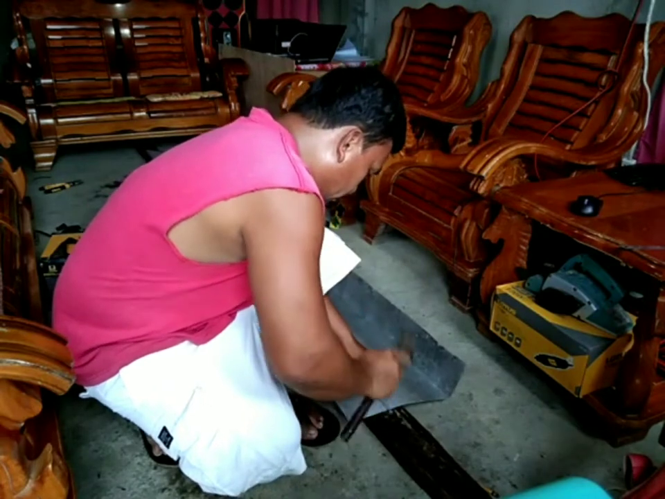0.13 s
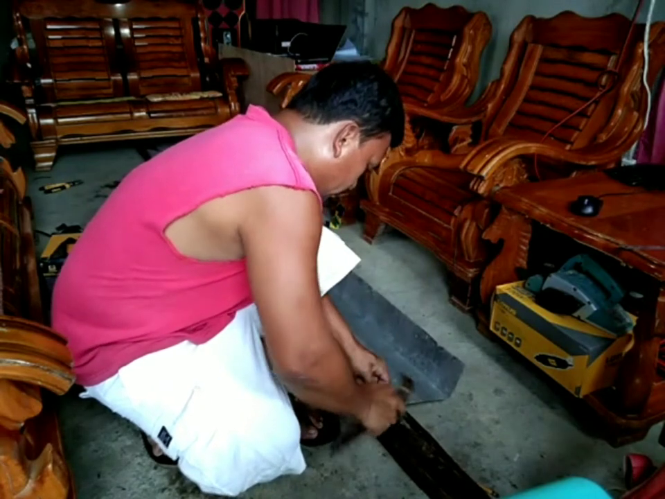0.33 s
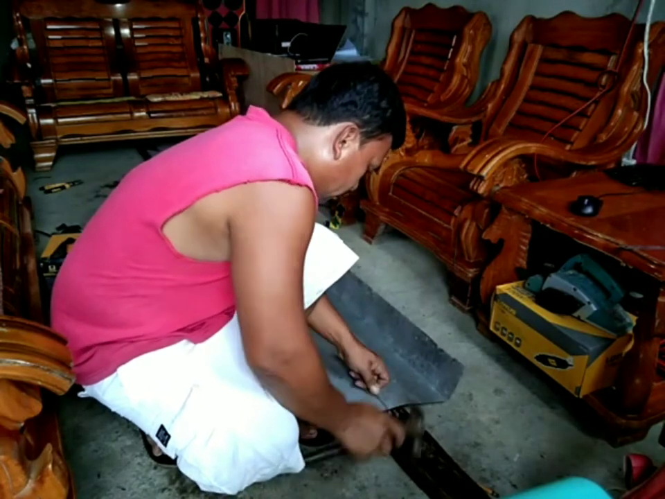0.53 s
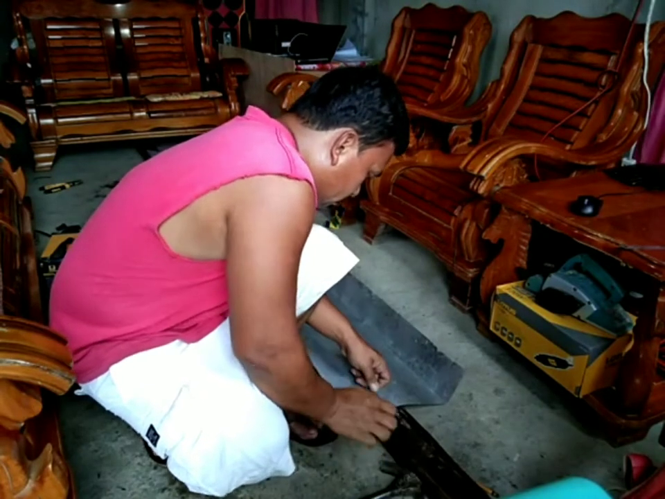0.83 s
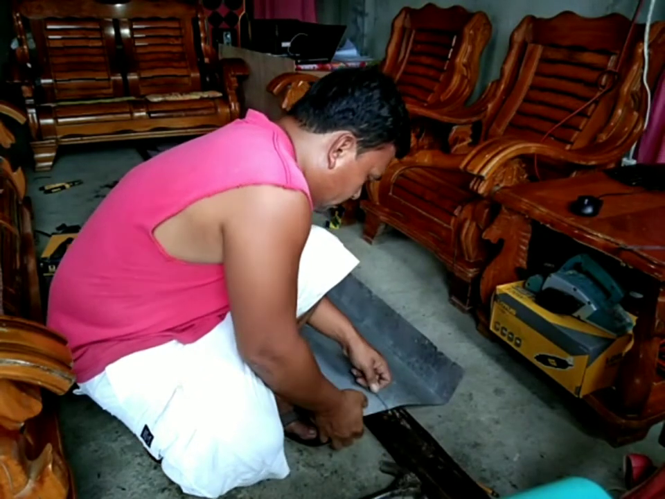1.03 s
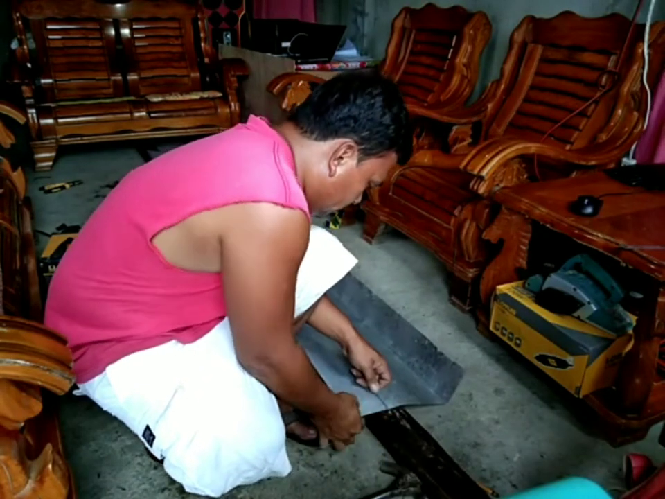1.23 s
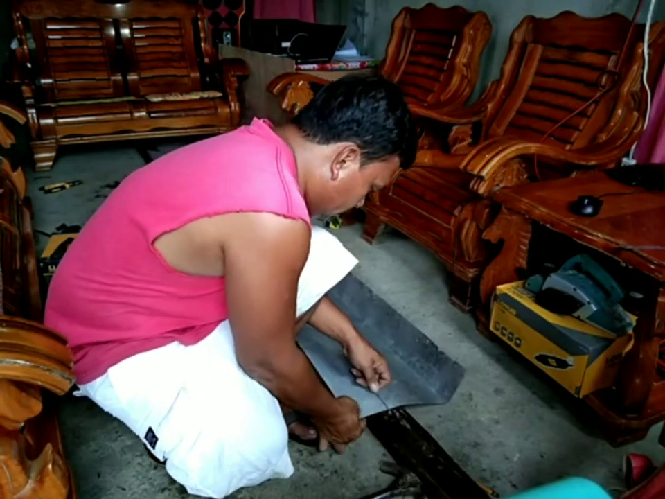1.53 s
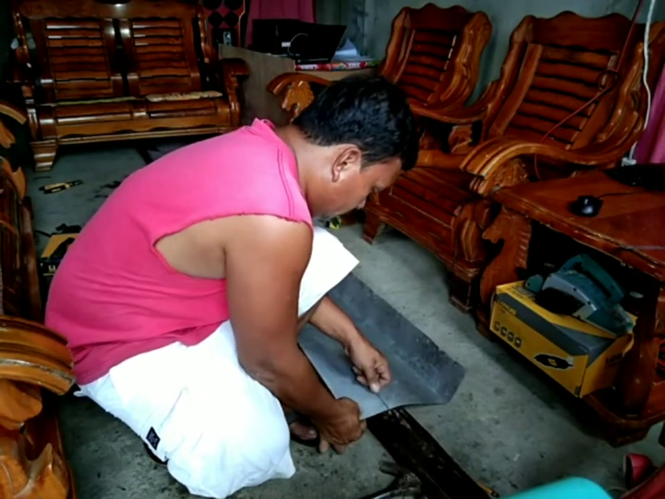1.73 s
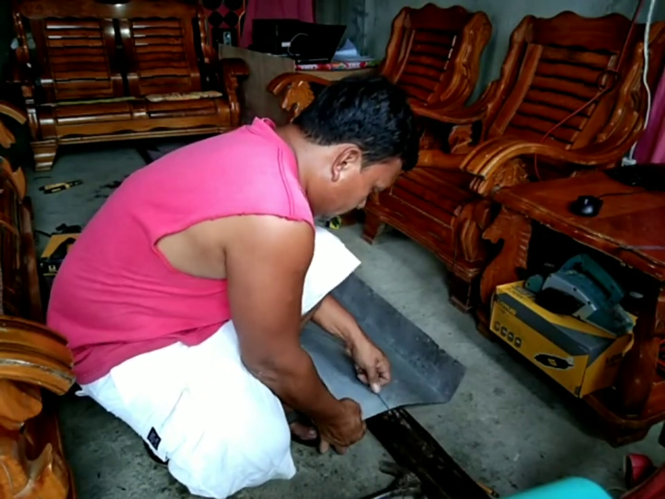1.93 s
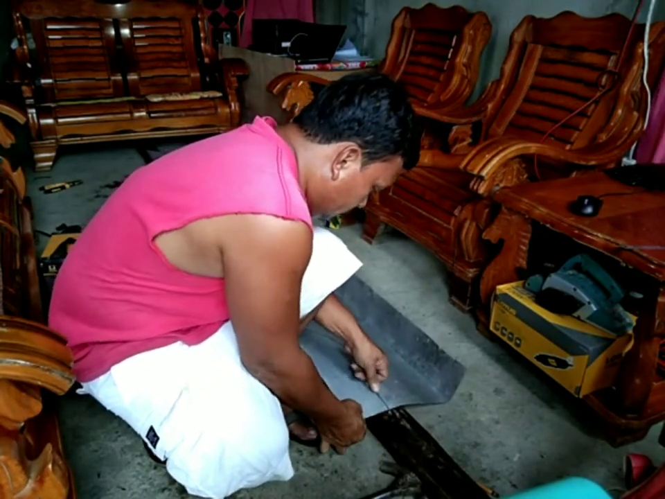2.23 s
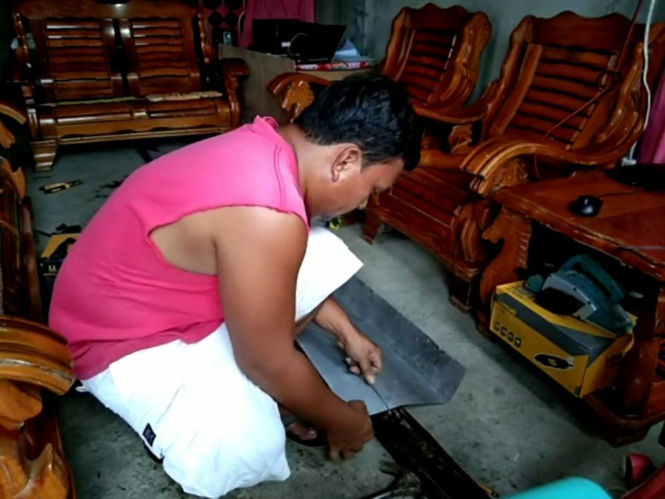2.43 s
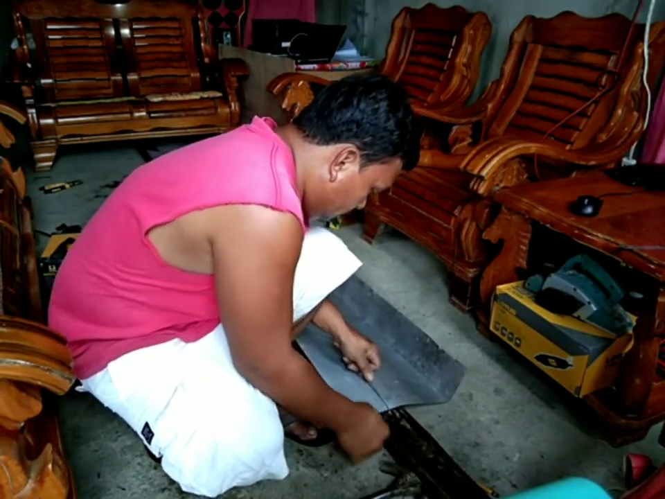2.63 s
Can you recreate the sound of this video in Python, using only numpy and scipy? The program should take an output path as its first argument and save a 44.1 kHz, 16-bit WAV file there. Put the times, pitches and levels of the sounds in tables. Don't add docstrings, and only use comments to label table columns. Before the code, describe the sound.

Metal sheet banged twice with a bar, bar drops and rattles, then faint taps over engine hum.

```python
import sys
import numpy as np
from scipy import signal
from scipy.fft import rfft, irfft, next_fast_len
from scipy.io import wavfile
from scipy.ndimage import uniform_filter1d, minimum_filter1d, map_coordinates

SR = 44100
rng = np.random.default_rng(int(sys.argv[2]) if len(sys.argv) > 2 else 0)


def elevation(decibels):
    levels = np.asarray(decibels, float)
    return 10 ** (levels / 20)


def bounce(signal):
    frames = np.transpose(np.atleast_2d(signal))
    limited = np.clip(frames, -1, 1)
    pcm = np.round(limited * 32767).astype(np.int16)
    wavfile.write(sys.argv[1], SR, pcm)


N = 123479


def unit(x):
    return x / np.sqrt(np.mean(x ** 2) + 1e-20)


def along(points, hz):
    f, v = np.transpose(points)
    return np.interp(np.log(hz + 1), np.log(f + 1), v)


def wobble(rate, count=N):
    knots = rng.standard_normal(int(count * rate / SR) + 4)
    return map_coordinates(knots, [np.arange(count) * rate / SR])


def filtered(x, response):
    m = next_fast_len(N + 8192)
    return irfft(rfft(x, m) * response(np.fft.rfftfreq(m, 1 / SR)), m)[:N]


def noise(spectrum):
    return unit(filtered(rng.standard_normal(N), lambda hz: elevation(along(spectrum, hz))))


def since(s):
    t = np.arange(N) / SR - s
    return np.maximum(t, 0), t >= 0


def add(out, x, s):
    part = out[max(round(s * SR), 0):][:len(x)]
    part += x[:len(part)]


def ringing(t, modes, attack_s, flutter=0):
    chatter_db, chatter_rad, chatter_rate = 1.2, .35, 60
    bend = 1.15
    total = np.zeros(len(t))
    for hz, db, t60, hold_s in modes:
        fall_db = 60 * (np.maximum(t - hold_s, 0) / t60) ** bend
        level_db = db - fall_db + flutter * chatter_db * wobble(chatter_rate, len(t))
        phase = 2 * np.pi * hz * t + flutter * chatter_rad * wobble(chatter_rate, len(t))
        total += elevation(level_db) * np.sin(phase)
    return total * (1 - np.exp(-t / attack_s))


def room(x, share=1):
    # hz [Hz], t60_s [s]
    room_decay = [(200, 0.98), (700, .8), (1400, 1), (4000, 0.35), (8000, 0.59)]
    hz, t, z = signal.stft(rng.standard_normal(SR), SR, nperseg=256)
    fall = elevation(-60 * t / (share * along(room_decay, hz)[:, None]))
    tail = signal.istft(z * fall, SR, nperseg=256)[1]
    return signal.fftconvolve(np.pad(x, (300, 0)), tail / np.linalg.norm(tail))[:N]


def yard():
    # hz [Hz], density_db [dB per Hz]
    hiss_tone = [(400, -29), (650, 1.5), (1500, -3.5), (3000, -6), (8000, -11.5), (9000, -41)]
    # start_s [s], length_s [s], pitch_hz [Hz], level_db [dB]; those before 2.3 s are yard noise,
    # the later ones pitchy streaks of the finger scuff and the first knock
    scrap_events = [(1.28, .18, 2480, -65), (1.33, .15, 1850, -65), (1.36, .24, 780, -64),
                    (1.555, .2, 1520, -68), (1.44, .08, 2380, -74), (1.61, .21, 2470, -65),
                    (1.71, .12, 760, -65), (1.78, .14, 830, -65), (1.8, .08, 1850, -73),
                    (1.77, .28, 2060, -73), (1.95, .08, 750, -69), (1.8, .11, 2460, -74),
                    (1.95, .19, 2490, -73), (1.71, .06, 2250, -71), (1.42, .14, 2080, -72),
                    (1.5, .04, 1700, -71), (2.19, .11, 840, -61), (1.38, .12, 7200, -84),
                    (2.376, .04, 3500, -64), (2.378, .06, 1750, -65), (2.385, .13, 2400, -59),
                    (2.43, .06, 4250, -64), (2.56, .07, 3800, -76), (2.575, .08, 6250, -78),
                    (2.39, .12, 2950, -62), (2.445, .07, 3850, -65), (2.39, .07, 4800, -65),
                    (2.4, .035, 5900, -67), (2.378, .05, 6900, -68), (2.385, .07, 7380, -67),
                    (2.378, .09, 5250, -69), (2.41, .05, 6450, -72), (1.76, .16, 580, -64),
                    (2.47, .08, 4050, -71)]
    width_hz, flutter_db, stretch = 50, 4, 1.25
    out = elevation(-74.5) * noise(hiss_tone)
    for start_s, length_s, pitch_hz, level_db in scrap_events:
        half_width = width_hz * np.sqrt(pitch_hz / 1000)
        band = unit(filtered(rng.standard_normal(N), lambda f: 1 / (1 + ((f - pitch_hz) / half_width) ** 4)))
        progress = np.clip(since(start_s)[0] / (stretch * length_s), 0, 1)
        swell = np.abs(np.sin(np.pi * np.sqrt(progress)))
        out += elevation(level_db - 2 + flutter_db * wobble(40)) * band * swell
    return out


def engine():
    # time_s [s], firing_rate [firings per s], level_db [dB]
    idle = [(0.0, 27.3, -37), (0.78, 27.4, -38), (2.8, 25.5, -41)]
    # order [multiple of firing rate], level_db [dB]
    orders = [(1, -36), (2, -20), (3, -20.5), (4, -7), (5, 1.5), (6, -2), (7, -19), (8, -36), (9, -14.5),
              (10, -18), (11, -14.5), (12, -20.5), (13, -4.5), (14, -7.5), (15, -23.5), (16, -11),
              (17, -20.5), (18, -30.5), (19, -24.5), (20, -20), (21, -34.5)]
    # hz [Hz], density_db [dB per Hz]
    rumble_tone = [(15, -58.5), (25, -33.5), (54, -20), (140, -2.5), (281, -16), (343, -12), (420, -6.5),
                   (528, -29), (620, -47), (810, -79), (1360, -120)]
    swing_db, drift_rad = -1, 0.38
    smear_rad = .035
    load_end_s, load_db, load_orders = 1.665, 10, range(8, 13)
    time_s, rate, level_db = np.transpose(idle)
    t = np.arange(N) / SR
    turn = 2 * np.pi * np.cumsum(np.interp(t, time_s, rate)) / SR
    load = load_db * np.clip((load_end_s - t) * 40, 0, 1)
    tones = np.zeros(N)
    for k, order_db in orders:
        gain_db = order_db + swing_db * wobble(20) + load * (k in load_orders)
        phase = k * (turn + 1.1) + smear_rad * k * k + 1.2 + drift_rad * wobble(5.1)
        tones += elevation(gain_db) * np.cos(phase)
    rumble = elevation(-4 + 0.7 * wobble(15)) * noise(rumble_tone)
    return elevation(np.interp(t, time_s, level_db)) * (unit(tones) + rumble)


def scuff():
    # hz [Hz], density_db [dB per Hz]
    scuff_tone = [(600, -16), (1000, -3), (2500, 0), (5000, -4), (7500, -6), (8000, -16)]
    start_s, rise_s, fall_s, level_db = 2.377, .03, .06, -55
    t = since(start_s)[0]
    mode_db = 6 * rng.standard_normal(120)
    rasp = unit(filtered(noise(scuff_tone), lambda hz: elevation(np.interp(hz, np.arange(120) * 150, mode_db))))
    swell = (1 - np.exp(-t / rise_s)) * np.exp(-t / fall_s)
    return elevation(level_db + 3.2 * wobble(80)) * swell * rasp


def bar():
    # start_s [s], ring_db [dB], clack_db [dB], lightness [0-1], chatter_s [s before it rings free]
    landings = [
        (0.8572, -33, -41.5, 1, .015),
        (.905, -36, -47.5, .7, 0.03),
        (.9412, -8, -15, 0, .083),
        (1.004, -60, -20, 0, 0.028),
    ]
    bar_pitches = [2004, 2568, 3224, 4151, 4325, 4450, 4604, 5156, 5505, 5661, 5894, 7241, 7645, 8349]
    # hard_db [dB], light_db [dB], t60_s [s], fed [share of the chatter that feeds it]
    bar_modes = [(-19, -4, .15, .35), (-30, -6, .25, 1.3), (-30, -18, .2, .4), (-12, -7, .16, 1),
                 (0, -16, .1, 1), (-26, -30, .1, 1), (-9, -6, .12, .95), (-17, -24, .12, 1),
                 (-25, -30, .12, .8), (-11, -28, .11, 1.05), (-16, -30, .11, 1.05), (-11, -2, .3, .2),
                 (-11, -8, .14, .4), (-28, -30, .2, .5)]
    # hz [Hz], density_db [dB per Hz]
    clack_tone = [(60, -33.5), (250, 2.5), (900, 10), (2000, -2), (5000, -15), (8000, -18.5)]
    # hz [Hz], density_db [dB per Hz]
    splash_tone = [(1500, -18.5), (3600, -13), (4200, -8), (4700, -6.5), (5600, -4), (6200, -19),
                   (7000, -14.5), (7500, -2.5), (8000, -22.5)]
    # start_s [s], level_db [dB]
    bounces = [(0.9397, -10.5), (.946, -16.5), (.9517, -19), (.9604, -17), (.976, -21), (1.007, -15.5),
               (1.028, -22), (1.042, -23.5)]
    clack_t60, splash_t60, rebound_t60 = 0.078, .16, .025
    out, after = np.zeros(N), np.arange(SR // 2) / SR
    for start_s, ring_db, clack_db, light, chatter_s in landings:
        t, on = since(start_s)
        modes = []
        for hz, (hard_db, light_db, t60, fed) in zip(bar_pitches, bar_modes):
            modes.append((hz, hard_db + light * (light_db - hard_db), t60, fed * chatter_s))
        add(out, elevation(ring_db) * ringing(after, modes, attack_s=0.0011, flutter=1), start_s)
        out += on * elevation(clack_db - 60 * t / clack_t60) * noise(clack_tone)
        splash_db = ring_db - 20 - 60 * np.maximum(t - chatter_s, 0) / splash_t60 + 3 * wobble(150)
        out += on * elevation(splash_db) * noise(splash_tone)
    raps = np.zeros(N)
    for start_s, level_db in bounces:
        t, on = since(start_s)
        raps += on * elevation(level_db - 60 * t / rebound_t60)
    out += raps * noise(splash_tone)
    return out + elevation(-14) * room(out, share=.7)


def sheet_modes(hz):
    # pitch_hz [Hz], width_hz [Hz], level_db [dB]
    strong_modes = [(416, 35, 5), (527, 22, 6), (828, 60, -2.5), (864, 13, -0.5), (1043, 30, -0.5),
                    (1121, 41, 1), (1536, 34, -0.5), (1693, 64, 0.5), (2206, 35, -2.5), (2410, 35, 1),
                    (2551, 39, 1.5), (2830, 10, -3.5)]
    gap_hz, dense_width_hz, scatter_db, strong_db = 36, 20, 2.5, 3

    def peak(pitch_hz, width_hz, level_db):
        return elevation(2 * level_db) / (1 + (2 * (hz - pitch_hz) / width_hz) ** 2)

    pitches = np.cumsum(gap_hz * (.3 + 1.4 * rng.random(size=260)))
    gains_db = scatter_db * rng.standard_normal(size=260)
    dense = sum(peak(f, dense_width_hz, db) for f, db in zip(pitches, gains_db))
    strong = sum(peak(f, width, db + strong_db) for f, width, db in strong_modes)
    return np.sqrt(dense / dense[hz < 8000].mean() + strong)


def sheet(hits, spectrum, climb, dies):
    # hz [Hz], climb_s [s]
    climb_times = [(200, .01), (1000, 0.025), (2000, .05), (3000, 0.072), (4500, 0.094), (8000, 0.17)]
    # hz [Hz], t60_s [s]
    crash_decay = [(150, 3.2), (500, 1.49), (1500, 0.75), (4000, 0.62), (8000, 0.45)]
    # hz [Hz], density_db [dB per Hz]
    tick_tone = [(300, -21), (1500, 12), (4000, -7.5), (7500, -8.5), (8500, -19)]
    # pitch_hz [Hz], level_db [dB], t60_s [s]
    gong_modes = [(127, 4, 0.14), (423, -7, 0.2), (520.9, -6, 0.2), (853, -10.5, 0.36),
                  (1104, -13.5, 0.027)]
    fall_bend = 1.456
    gong_lift_db = 10.5
    tick_t60, thud_lag_s = .07, 0.00608
    out, grid, after = np.zeros(N), np.arange(5000) * 2.0, np.arange(SR // 2) / SR
    modes = sheet_modes(grid)
    for start_s, crash_db, tick_db, thud_db, bright_db in hits:
        t, on = since(start_s)
        wash = unit(filtered(noise(spectrum), lambda f: np.interp(f, grid, modes)))
        hz, frame_s, z = signal.stft(wash, SR, nperseg=256)
        u = np.maximum(frame_s - start_s, 0)
        rise = 1 - np.exp(-(u / (climb * along(climb_times, hz)[:, None])) ** 2)
        fall = elevation(-60 * (u / (dies * along(crash_decay, hz)[:, None])) ** fall_bend)
        tilt = elevation(bright_db * np.log2(hz / 1500 + 0.059))[:, None]
        crash = signal.istft(z * rise * fall * tilt, SR, nperseg=256)[1][:N]
        out += on * elevation(crash_db) * crash
        out += on * elevation(tick_db - 60 * t / tick_t60) * noise(tick_tone)
        gong = [(f, db + gong_lift_db * bright_db * (f > 300), t60, 0) for f, db, t60 in gong_modes]
        add(out, elevation(thud_db) * ringing(after, gong, attack_s=0.0034), start_s + thud_lag_s)
    return out + elevation(-11) * room(out)


def knocks():
    # start_s [s], crash_db [dB], tick_db [dB], thud_db [dB], brightness_db [dB per octave]
    touches = [
        (2.438, -40, -91, -56, 1.5),
        (2.452, -37.5, -70, -56.5, 2.5),
        (2.66, -48, -90, -61, -3),
        (2.678, -40.5, -85, -45.5, -1.5),
    ]
    # hz [Hz], density_db [dB per Hz]
    knock_tone = [(300, -6), (520, -9), (870, -2), (1500, -10.5), (1950, -20.5), (2400, -14.5), (2750, -41),
                  (2950, -31), (3400, -40), (4100, -30), (4600, -47), (9000, -80)]
    return sheet(touches, knock_tone, climb=0.14, dies=0.5)


def blows():
    # start_s [s], crash_db [dB], tick_db [dB], thud_db [dB], brightness_db [dB per octave]
    strikes = [
        (-.22, -14, -60, -59.5, -2),
        (.1352, -3.5, -12.5, -15.5, 0.24),
        (.4564, -19.5, -10.5, -33, 0.5),
        (.466, -3.5, -40, -20.5, 1.54),
    ]
    # hz [Hz], density_db [dB per Hz]
    crash_tone = [(90, -33.5), (200, -15), (420, -10.5), (1000, -1), (2000, 0.5), (3200, -0.5),
                  (5000, -5.5), (7500, -8), (8600, -24.5), (11000, -65)]
    return sheet(strikes, crash_tone, climb=0.98, dies=0.93)


def suppress(x):
    # hz [Hz], threshold_db [dB]
    gate_curve = [(450, -110), (620, -78), (1300, -67.5), (2200, -90), (8000, -77)]
    slope, depth_db = 1.6, -45
    hz, _, z = signal.stft(x, SR, nperseg=512)
    power = uniform_filter1d(uniform_filter1d(np.abs(z) ** 2, size=5, axis=0), size=5, axis=1)
    level_db = 10 * np.log10(np.abs(power) + 1e-20)
    cut_db = np.clip(slope * (level_db - along(gate_curve, hz)[:, None]), depth_db, 0)
    return signal.istft(z * elevation(cut_db), SR, nperseg=512)[1][:N]


def scene():
    steel = blows() + knocks() + bar()
    return (suppress(steel) + scuff() + engine() + yard())[None]


def band_limit(x):
    return signal.sosfilt(signal.butter(12, 9130, fs=SR, output="sos"), x)


def record(dry):
    # hz [Hz], gain_db [dB]
    phone_band = [(25, -8.5), (70, 1.5), (7700, -3.5), (8050, -5.5), (8500, -21), (8800, -47.5),
                  (9200, -78.5)]
    limit_db, squeeze, hold_s, release_s = -15, 0.62, 0.002, 0.036
    level_db = 10 * np.log10(np.abs(uniform_filter1d(dry[0] ** 2, size=220)) + 1e-12)
    need_db = -squeeze * np.maximum(level_db - limit_db, 0)
    need_db = minimum_filter1d(need_db, int(hold_s * SR) + 1)
    memory = np.exp(-1 / (release_s * SR))
    release_db = signal.lfilter([1 - memory], [1, -memory], need_db)
    gain_db = np.minimum(release_db, uniform_filter1d(need_db, size=130))
    mix = filtered(dry[0] * elevation(gain_db), lambda hz: elevation(along(phone_band, hz)))
    return band_limit(mix[None])


dry = scene()
out = record(dry)
bounce(out)
```